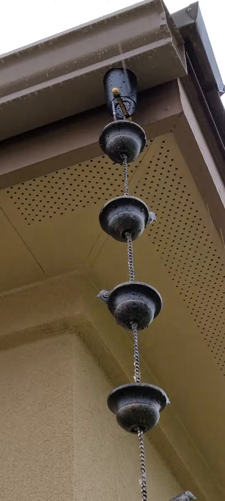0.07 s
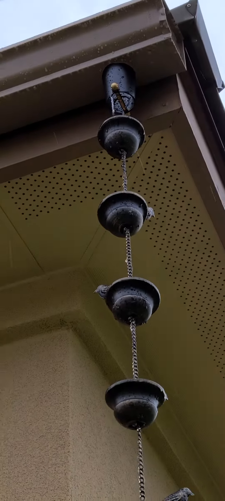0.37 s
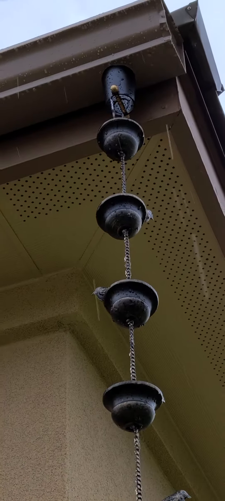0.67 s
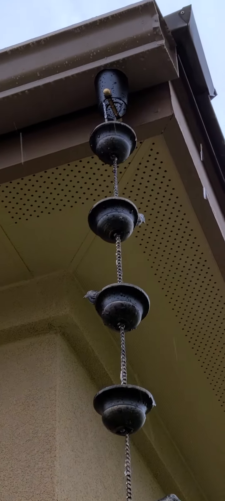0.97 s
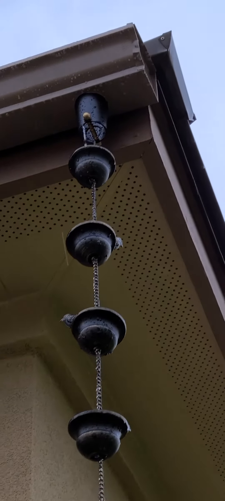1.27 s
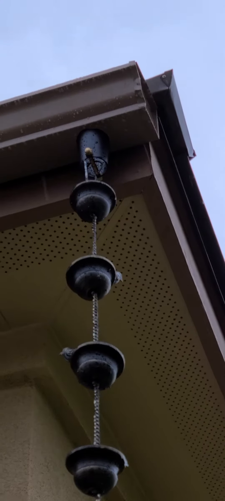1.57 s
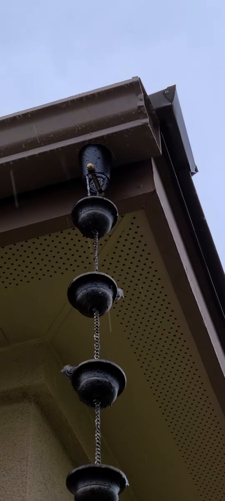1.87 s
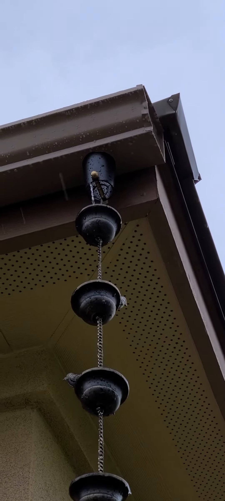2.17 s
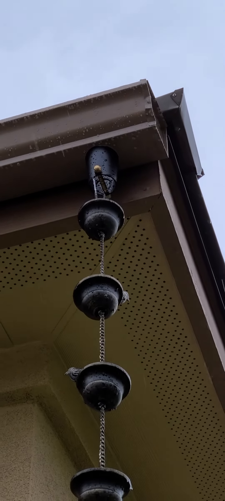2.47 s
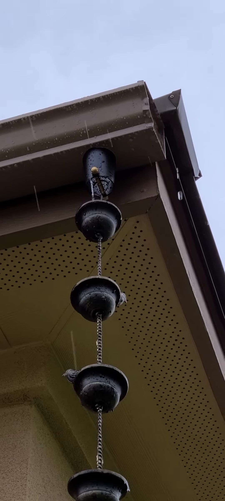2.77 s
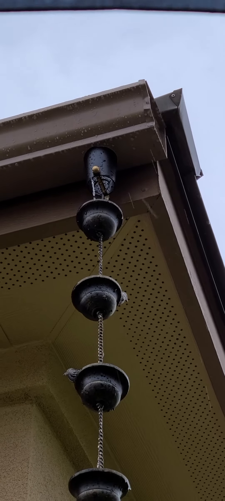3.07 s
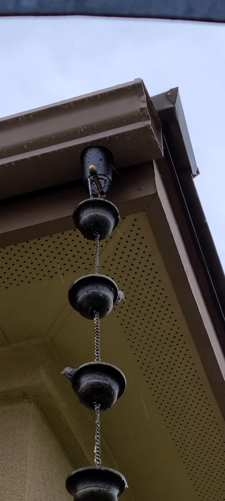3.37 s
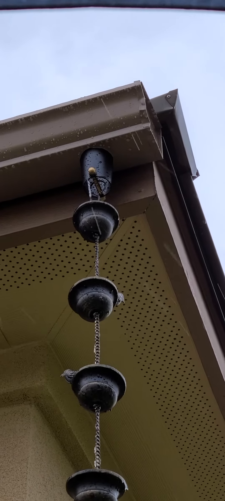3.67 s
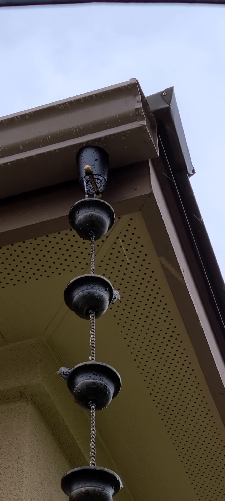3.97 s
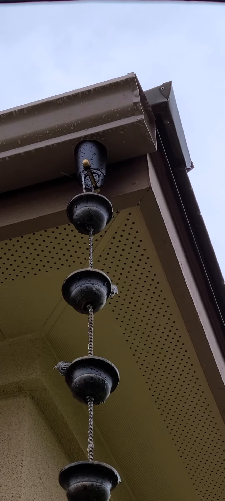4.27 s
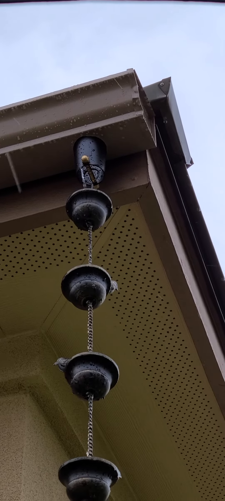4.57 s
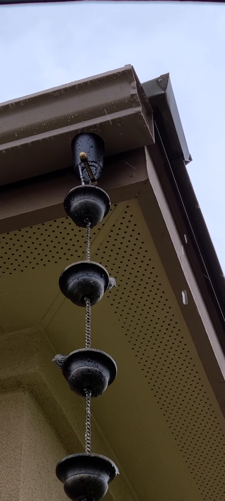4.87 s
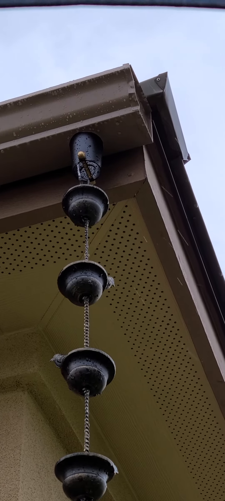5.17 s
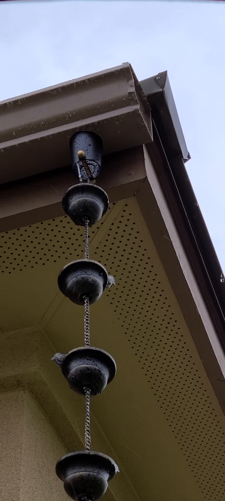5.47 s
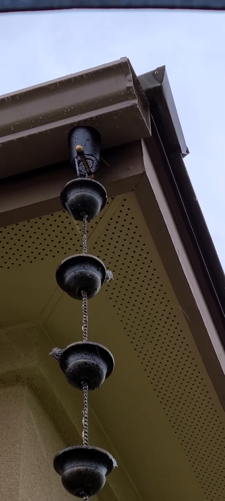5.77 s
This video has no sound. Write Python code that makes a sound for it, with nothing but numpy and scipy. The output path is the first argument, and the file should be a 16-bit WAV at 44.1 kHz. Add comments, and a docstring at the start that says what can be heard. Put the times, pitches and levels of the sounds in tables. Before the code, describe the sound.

Heard from under an umbrella outdoors, raindrops snap and thud on the taut cloth throughout, with occasional tiny bright splashes. A soft wash of rain lies beyond, along with the faint metallic ring of a rain chain and a few very faint, far bird calls. Past the midpoint, wind hits the microphone in several low, thumping gusts beneath the continuing patter.

```python
"""Rain on an umbrella in a garden

The microphone is a phone just under the canopy, beside a roof gutter with a rain chain. Each drop is a
sharp push on the taut cloth followed by a short ring. Behind it the garden hisses, the chain's metal
cups ring faintly and birds call far off. Later, gusts buffet the two microphone ports."""
import sys
import numpy as np
from scipy import signal
from scipy.fft import rfft, irfft
from scipy.io import wavfile
from scipy.ndimage import uniform_filter1d

SR = 44100
rng = np.random.default_rng(int(sys.argv[2]) if len(sys.argv) > 2 else 0)


def generate_wav(signal):
    """Clip the signal to [-1, 1] and save it as 16-bit WAV at the path in sys.argv[1]."""
    frames = np.transpose(np.atleast_2d(signal))
    scaled = np.clip(frames, -1, 1) * 32767
    pcm = np.round(scaled).astype(np.int16)
    wavfile.write(sys.argv[1], SR, pcm)


N = 260631
TIME = np.arange(N) / SR
FREQ = np.fft.rfftfreq(N, 1 / SR)

# heavy drops just overhead: (time [s], thud [dB], snap over thud [dB], relative ring [dB],
# pitch of the spot [Hz], lag of the right port [ms])
HEAVY_DROPS = [(0.1123, -23.5, 0, 0, 1880, 0.39), (0.1171, -31.5, -3, 6, 3600, .1),
               (0.1556, -36.5, 6.5, -13, 6060, 0.57), (0.2143, -22, -12, 6.5, 6500, .25),
               (0.289, -39, 5, 2, 4200, 0.5), (0.3083, -20.5, -2.5, -5, 7500, 0.45),
               (0.3248, -27.5, 2.5, -5, 3070, 0.37), (.3673, -33.5, 0, 14.5, 2480, 0.43),
               (0.4077, -29.5, 0.5, -5, 5850, 0.27), (0.4123, -26.5, -5, 4, 5750, 0.4),
               (0.4235, -28.5, 1, 10, 6100, 0.2), (0.505, -33, 1, 12.5, 1390, 0.45),
               (0.53, -30.5, 2, 0, 1764, 0.52), (0.5423, -30, 3, -9, 5200, 0.47),
               (0.6014, -29.5, -0.5, 6, 4770, 0.42), (0.6781, -21.5, -6, 0, 2970, 0.35),
               (0.8208, -33, -3, 0, 1815, 0.47), (.882, -35, 1, 8, 854, 0.37),
               (.9457, -30, -4, 5, 1700, 0.41), (0.9871, -29, -5, -12, 2620, 0.39),
               (1.0616, -33, 4, 5.5, 2240, 0.14), (1.0813, -31, -3, 0, 5440, 0.45),
               (1.1613, -24.5, -5, 4, 5180, 0.38), (1.2729, -28.5, -2, 9.5, 2580, 0.37),
               (1.334, -28, -4, 9, 3170, .31), (1.399, -27.5, -6.5, 9, 5480, 0.38),
               (1.524, -36, 1, 8.5, 5420, .27), (1.5622, -35, -1, 4, 1707, 0.52),
               (1.6772, -30.5, 1, 8, 970, .34), (1.7, -36.5, 4, -5, 3100, 0.49),
               (1.9692, -36, -5, 9, 3240, 0.25), (2.0372, -29, -8, -10, 6730, 0.42),
               (2.1564, -36.5, 4.5, 3, 1490, 0.53), (2.2107, -46, 14, -8, 4440, 0.21),
               (2.249, -38, -2, 15, 2880, 0.7), (2.2624, -36, -3, -1, 1800, 0.55),
               (2.2813, -33, -0.5, 11.5, 4160, 0.48), (2.3224, -24.5, -6, 0, 1400, 0.31),
               (2.347, -33.5, 1, 14, 2360, 0.46), (2.3745, -22.5, -8, 7.5, 3530, 0.44),
               (2.6374, -45, 6.5, 17.5, 2270, 0.38), (2.6625, -40, 5, 15.5, 1690, 0.28),
               (2.838, -34.5, 0, 7, 6770, 0.54), (2.8473, -27.5, -7, -3, 6060, .2),
               (2.9154, -39, 4.5, 8.5, 2260, 0.44), (3.0033, -25.5, -8, -2, 3330, .38),
               (3.0373, -31.5, 1, -9, 1970, 0.5), (3.076, -25.5, -7, -1, 1960, .38),
               (3.101, -31, -9, -4, 6840, .49), (3.1809, -36, -8, 5, 1100, 0.17),
               (3.1877, -31.5, -3.5, 12.5, 3080, 0.22), (3.263, -26, -7, -2, 4110, 0.37),
               (3.2877, -24, -8.5, -5, 4860, 0.53), (3.3984, -26, -2, 0, 5240, .48),
               (3.4198, -33.5, 4, -12, 1888, 0.537), (3.5461, -27.5, 0, -18, 747, 0.5),
               (3.662, -34.5, 0, 1, 3050, 0.18), (3.6758, -42.5, 4, 10, 1710, 0.57),
               (3.7842, -20, -6.5, -10, 710, 0.3), (3.812, -20, -11.5, -6, 3460, 0.29),
               (4.0858, -21, -9, -17, 2500, 0.52), (4.1396, -23, 0, 5.5, 2260, 0.34),
               (4.2005, -37, 6, -9, 3850, 0.41), (4.3199, -26, -2.5, 8.5, 1880, 0.33),
               (4.3543, -25.5, -4.5, 7.5, 4950, 0.22), (4.4254, -36, -4, 5, 1490, .2),
               (4.5698, -35, -2, 3, 1930, 0.563), (4.782, -31.5, -5, 9, 5000, 0.3),
               (4.8357, -30.5, -2, -8, 550, 0.42), (4.8562, -27, -2, 4, 6900, 0.5),
               (4.8947, -26.5, -1.5, -10, 2620, 0.39), (4.9165, -27.5, -4, -3, 2600, 0.14),
               (5.0434, -32, 3, 8, 864, 0.33), (5.0526, -30.5, -12, 13, 6700, 0.38),
               (5.1338, -34, -2, 8, 1690, 0.61), (5.1431, -29, -3.5, 5, 1900, 0.41),
               (5.3864, -33.5, -14, 3, 1070, 0.086), (5.417, -33, -3, 3, 870, 0.23),
               (5.49, -25.5, -10, 2.5, 1330, 0.29), (5.8231, -32.5, -1.5, 6, 4300, 0.42),
               (5.8388, -23.5, -9.5, 5, 1390, 0.43)]


def undb(db):
    """Decibels to gain."""
    return 10 ** (np.asarray(db) / 20)


def colour(points, f, column=1):
    """A spectrum in dB, joined by straight lines over log frequency."""
    points = np.array(points, float)
    return np.interp(np.log(f + 1), np.log(points[:, 0]), points[:, column])


def resonance(f, hz, width_hz):
    """Response of one mode, gain 1 at its centre."""
    return 1j * f * width_hz / (hz ** 2 - f ** 2 + 1j * f * width_hz)


def minimum_phase(db):
    """The most abrupt response that has these levels."""
    cepstrum = irfft(db * np.log(10) / 20)
    half = cepstrum.shape[-1] // 2
    fold = np.r_[1, np.full(half - 1, 2), 1, np.zeros(half - 1)]
    return np.exp(rfft(cepstrum * fold))


def unit(x):
    """Scale to rms 1."""
    return x / np.sqrt(np.mean(x ** 2))


def wander(rate_hz):
    """A slow random curve of rms 1."""
    hold = int(SR / rate_hz)
    steps = np.repeat(rng.standard_normal(N // hold + 1), hold)
    return unit(uniform_filter1d(steps, hold)[:N])


def noise_pair(likeness, lag_ms=0):
    """Spectra of white noise at the two ports; the shared part reaches the right one lag_ms late."""
    left, own = rfft(rng.standard_normal((2, N)))
    shared = left * np.exp(-2j * np.pi * FREQ * lag_ms / 1000)
    return np.array([left, likeness * shared + np.sqrt(1 - likeness ** 2) * own])


def envelope(s, length, attack_s, release_s):
    """Rises towards time s, holds for a length, then dies away."""
    return np.exp(np.minimum(TIME - s, 0) / attack_s - np.maximum(TIME - s - length, 0) / release_s)


def rain_strength(shower_db=1.5, ease_s=0.67, flurry_db=0.64, flurry_s=0.033):
    """Level of the rain in dB: a shower that eases, with a flurry wherever heavy drops crowd."""
    s = TIME[::100]
    crowd = sum(np.exp(-((s - drop[0]) / flurry_s) ** 2) for drop in HEAVY_DROPS)
    flurries = np.interp(TIME, s, unit(crowd - crowd.mean()))
    return shower_db * np.exp(-TIME / ease_s) + flurry_db * flurries


def garden_and_mic_hiss(rain_db, flicker_db=2.02):
    """Distant rain merges into a wash over a low rumble; the right microphone adds its own thin hiss."""
    # wash of rain on the garden: (frequency [Hz], left density [dB per Hz], right density [dB per Hz])
    wash_spectrum = [(25, -88, -71.5), (51.7, -68.5, -68), (118.5, -71.5, -68), (157, -83.5, -81.5),
                     (348, -80, -78), (790, -85, -83.5), (1166, -90.5, -78), (1750, -95, -86),
                     (2760, -93.5, -83), (4250, -102, -92), (7100, -102, -92), (8500, -107, -100),
                     (9800, -106, -99), (15300, -111, -107)]
    # two bands that stand out of the wash, then the right microphone's self-noise at 9080 Hz:
    # (centre [Hz], width [Hz], right density [dB per Hz], left minus right [dB])
    bands = [(2632, 35, -75, -9), (5860, 86, -112, -15), (9080, 105, -88, -12)]
    gain = undb([colour(wash_spectrum, FREQ, column) for column in (1, 2)])
    peaks = sum(undb(db + np.array([[left_db], [0]])) * resonance(FREQ, hz, width)
                for hz, width, db, left_db in bands)
    wash = noise_pair(likeness=1 / (1 + (FREQ / 1000) ** 2), lag_ms=0.061) * gain
    # only the part above the rumble follows the strength of the rain
    low = 1 / (1 + (FREQ / 220) ** 4)
    hiss = irfft(wash * (1 - low), N) * undb(0.89 * rain_db + flicker_db * wander(60))
    steady = irfft(wash * low + noise_pair(0) * peaks, N)
    return np.sqrt(SR / 2) * (hiss + steady)


def cup_ring_and_birds(blur_hz=30, left_db=-3, far_db=-2):
    """A rain-chain cup rings thin and high; far birds whistle and hoot, blurred by echoes off houses."""
    # the cup first, then the birds: (start [s], length [s], pitch [Hz], relative level [dB])
    tones = [(.08, 0.4, 6240, -61), (2.415, 0.19, 2432, -54.5), (2.551, 0.58, 496, -54.5),
             (3.112, 0.26, 1450, -53), (3.807, 0.25, 2450, -54.5), (4.52, 0.24, 479, -51),
             (5.76, 0.28, 2535, -56)]
    out = np.zeros((2, N))
    for s, length, hz, db in tones:
        progress = np.clip((TIME - s) / length, 0, 1)
        swell = np.sqrt(np.maximum(np.sin(np.pi * progress), 0))
        tone = unit(irfft(noise_pair(0.73) * resonance(FREQ, hz, 2 * blur_hz) ** 2, N))
        out += undb(db + far_db) * swell * tone
    return out * undb([[left_db], [0]])


def rain_chain(level_db=-62, width_hz=16, left_db=-6, count=1500):
    """Water trickles from cup to cup below the gutter; its tiny drips keep the metal faintly ringing."""
    # modes of the cups: (frequency [Hz], relative level [dB])
    cup_modes = [(2609, -5.5), (2734, 14), (3498, -16), (3557, 11.5), (3854, 8), (4268, 11), (6048, -8),
                 (6106, 7)]
    ringing = 0
    for hz, db in cup_modes:
        when, size = rng.random((count, 2)).T
        drips = np.bincount((when * N).astype(int), size, N)
        port_phase = np.exp(2j * np.pi * rng.random((2, 1)))
        ringing = ringing + undb(db) * rfft(drips) * resonance(FREQ, hz, width_hz) * port_phase
    return unit(irfft(ringing, N)) * undb(level_db + np.array([[left_db], [0]]))


def wind_strength(side, flutter_hz=11.7, flutter_db=4, flutter_peak_s=0.15, sag_db_per_s=12,
                  breeze_db=-37.5, breeze_pan_db=-12.5, lead_s=0.095):
    """Fluttering gusts, each with a light breeze that runs ahead and outlasts it; one gain a port."""
    # gusts on the ports: (start [s], length [s], level [dB], left minus right [dB])
    gust_list = [(3.795, 0.35, -21, -9), (4.384, 0.2, -30, -11.5), (4.757, 0.59, -23.5, -9),
                 (5.758, .1, -32.5, -12)]
    gusts, breeze = 0, 0
    for s, length, db, pan_db in gust_list:
        age = np.maximum(TIME - s, 0)
        # a gust soon breaks into quick lumps, then evens out
        depth_db = flutter_db * age / flutter_peak_s * np.exp(1 - age / flutter_peak_s)
        lumps_db = depth_db * np.cos(2 * np.pi * flutter_hz * age)
        level_db = db - sag_db_per_s * age + lumps_db + pan_db * side
        gusts = gusts + envelope(s, length, attack_s=0.02, release_s=0.047) * undb(level_db)
        breeze = np.maximum(breeze, envelope(s - lead_s, length + lead_s, attack_s=0.02, release_s=0.16))
    return np.hypot(gusts, breeze * undb(breeze_db + breeze_pan_db * side))


def wind(eddy_s=0.02, eddy_lag_s=0.0028, low_cut_hz=22, bend=0.28):
    """Turbulence presses right on each microphone port; the strongest eddies pass as single thumps."""
    # rumble of the ports: (frequency [Hz], relative level [dB])
    rumble_spectrum = [(10, 2.5), (30, -10.5), (62, 2), (80, 0.5), (100, -5), (130, -17), (190, -26.5),
                       (320, -32.5), (700, -56), (2000, -89)]
    # eddies within the gusts: (time [s], level [dB], pitch [Hz], left minus right [dB])
    eddies = [(3.869, -9, 69.8, -4.5), (3.967, -12.5, 71.6, -1), (4.405, -24.5, 64, -11),
              (4.822, -21, 75.4, 9), (4.936, -23, 68.5, -22), (5.265, -18, 60.2, -8),
              (5.355, -22.5, 64.7, 6), (5.808, -16, 60.3, 1)]
    side = np.array([[0.5], [-0.5]])  # left, right
    rumble = irfft(noise_pair(0.12, lag_ms=0.28) * undb(colour(rumble_spectrum, FREQ)), N)
    even_rumble = unit(rumble / np.sqrt(uniform_filter1d(rumble ** 2, size=1800)))
    pressure = even_rumble * wind_strength(side)
    for s, db, hz, pan_db in eddies:
        t = TIME - s + eddy_lag_s * side
        pressure += np.exp(-(t / eddy_s) ** 2) * np.sin(2 * np.pi * hz * t) * undb(db + pan_db * side)
    # hard pushes bend the response of the ports; they also leak, so the slowest swings are lost
    leak = signal.butter(2, low_cut_hz, "high", fs=SR, output="sos")
    return signal.sosfilt(leak, pressure + bend * pressure ** 2)


def splashes(relative_width=0.95):
    """Drops burst into a fine, bright spray close to the microphone."""
    # bursting drops: (time [s], level [dB], decay [s], pitch [Hz])
    bursts = [(0.289, -51, 0.0017, 4500), (.382, -42, 0.005, 12500), (1.438, -44, 0.0024, 12400),
              (1.92, -45, 0.0022, 12340), (2.543, -45, 0.0024, 12020), (3.028, -39, 0.0035, 9700),
              (3.604, -52, .002, 13100), (4.712, -45, 0.0035, 12500), (5.569, -43, 0.0044, 11000),
              (5.5715, -25.5, 0.0025, 12600), (5.593, -42, 0.0027, 11900)]
    out = np.zeros((2, N))
    for s, db, decay, hz in bursts:
        spray = unit(irfft(noise_pair(0.094) * resonance(FREQ, hz, relative_width * hz), N))
        out += undb(db) * (TIME >= s) * np.exp(-np.abs(TIME - s) / decay) * spray
    return out


def canopy(drops, ring_db, rebound, echo_db, spot_db, scatter_db, scatter_s, right_scatter_db):
    """Each drop pushes the cloth once; it springs back and rings, differently for every spot."""
    # push of an average drop: (frequency [Hz], relative level [dB])
    push_spectrum = [(60, -18), (170, 22.5), (350, 22.5), (600, 25.5), (1100, 22), (1600, 17.5), (2200, 18),
                     (3200, 13), (4600, 6), (6800, 5.5), (8500, -2.5), (13000, 4), (16000, -7)]
    # modes of the cloth and ribs: (frequency [Hz], width [Hz], relative level [dB])
    modes = [(353, 28, -4.5), (710, 69, -9), (1111, 76, 7), (1340, 63, -7), (1876, 195, -4), (2920, 93, -4)]
    # how much louder the right port hears the drops: (frequency [Hz], gain [dB])
    right_port = [(200, -3.5), (600, -1), (1200, 1.5), (2000, 3), (4500, 6.5), (6500, 6), (9000, 5),
                  (15000, -3)]
    s, thud_db, snap_db, spray_db, own_ring_db, spot_hz, lag_ms = drops.T[:, :, None]
    size = 1024  # samples a drop
    f, t = np.fft.rfftfreq(size, 1 / SR), np.arange(size) / SR

    def late(ms):
        return np.exp(-2j * np.pi * f * ms / 1000)

    def burst(decay_s):
        noise = rng.standard_normal((len(drops), size))
        return rfft(noise * np.exp(-t / decay_s)) * np.sqrt(2 / (decay_s * SR))

    # a faster, smaller drop makes a shorter contact and so more treble; each spot favours one pitch
    snap = 1 / (1 + (1700 / (f + 1)) ** 4)
    spray = 1 / (1 + (8200 / (f + 1)) ** 6)
    spot = np.abs(resonance(f, spot_hz, 0.22 * spot_hz)) ** 2
    push_db = colour(push_spectrum, f) + thud_db + snap_db * snap + spray_db * spray + spot_db * spot
    push = minimum_phase(push_db)
    # the water flattens and tears within a millisecond, which roughens the treble
    torn = 0.55 * snap
    contact = np.sqrt(1 - torn ** 2) + torn * burst(0.0009)
    # the cloth springs back at once; whoever holds the umbrella throws back a dull echo
    tension, path = rng.uniform(-1.17, 1, (len(drops), 2)).T[:, :, None]
    echo = undb(echo_db) * late(3.5 + 1.28 * path) * (1 - 0.5 * snap)
    impact = contact - rebound * late(0.392 + 0.14 * tension) + echo
    chance = rng.standard_normal((len(drops), len(modes), 2)).transpose(1, 2, 0)[..., None]
    ring = sum(undb(db + 2 * louder) * resonance(f, hz * (1 + 0.025 * detune), width)
               for (hz, width, db), (louder, detune) in zip(modes, chance))
    ring *= undb(ring_db + own_ring_db)
    # waves scattered by the seams and ribs reach the two ports unrelated
    scatter = undb(scatter_db) * (1 + 2 * ring)
    left = impact + ring + scatter * burst(scatter_s)
    right = impact + ring + scatter * burst(scatter_s) * undb(right_scatter_db * snap)
    right *= minimum_phase(colour(right_port, f)) * late(lag_ms)
    taps = irfft(np.stack([push * left, push * right], axis=1))
    out = np.zeros((2, N + size))
    for start, tap in zip((s[:, 0] * SR).astype(int), taps):
        out[:, start:start + size] += tap
    return out[:, :N]


def drizzle(rain_db, mean_db=-45, count=700):
    """Small drops land at random all over the canopy."""
    when, place, pitch = rng.random((count, 3)).T
    snap, spray, ring = np.clip(rng.standard_normal((count, 3)), -2, 2).T
    s = when * (N - 1) / SR
    thud_db = mean_db + np.interp(s, TIME, rain_db)
    snap_db, spray_db, ring_db = -2 + 4 * snap, -1 + 3.5 * spray, 2 * ring
    spot_hz, lag_ms = 600 * 10 ** pitch, 0.18 + 0.35 * place
    drops = np.c_[s, thud_db, snap_db, spray_db, ring_db, spot_hz, lag_ms]
    return canopy(drops, ring_db=1, rebound=0.027, echo_db=-27, spot_db=11.5,
                  scatter_db=-12.5, scatter_s=0.012, right_scatter_db=-4)


def medium_drops(rain_db, mean_db=-36, count=66):
    """Middling drops fall more often where it rains harder; rows as in HEAVY_DROPS."""
    slot, pitch, size_db, snap, ring, place = rng.uniform(-1, 1, (count, 6)).T
    fallen = np.cumsum(undb(2 * rain_db))
    share = (np.arange(count) + 0.5 + slot / 2) / count
    s = np.interp(share, fallen / fallen[-1], TIME)
    thud_db = mean_db + size_db + np.interp(s, TIME, rain_db)
    snap_db, ring_db = -1 + 3 * snap, 1.5 + 5 * ring
    spot_hz, lag_ms = 2700 * 2.4 ** pitch, 0.365 + 0.2 * place
    return np.c_[s, thud_db, snap_db, ring_db, spot_hz, lag_ms]


def patter(drops, average_snap_db=-27.5, spray_lost_per_db=0.21, spray_spread_db=5):
    """Drops just above the microphone; each throws fine spray, which grows more slowly than its snap."""
    s, thud_db, snap_db, ring_db, spot_hz, lag_ms = np.array(drops, float).T
    extra_snap_db = thud_db + snap_db - average_snap_db
    spray_db = 0.6 - spray_lost_per_db * extra_snap_db + spray_spread_db * rng.uniform(-0.94, 1, len(s))
    rows = np.c_[s, thud_db, snap_db, spray_db, ring_db, spot_hz, lag_ms]
    return canopy(rows, ring_db=-1, rebound=0.2, echo_db=-9, spot_db=7,
                  scatter_db=-12, scatter_s=0.003, right_scatter_db=10)


def scene():
    """From under the umbrella: drops overhead, the garden beyond, wind on the microphone."""
    rain_db = rain_strength()
    overhead = patter(HEAVY_DROPS) + patter(medium_drops(rain_db)) + drizzle(rain_db)
    background = garden_and_mic_hiss(rain_db) + rain_chain() + cup_ring_and_birds()
    return overhead + background + splashes() + wind()


def record(dry):
    """The phone opens its input after a moment and cuts the highest treble."""
    open_s, top_hz = 0.094, 15700
    high_cut = signal.ellip(8, 0.2, 70, top_hz, fs=SR, output="sos")
    return signal.sosfilt(high_cut, dry * (TIME >= open_s))


dry = scene()
out = record(dry)
generate_wav(out)
```